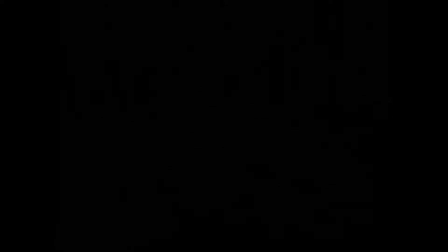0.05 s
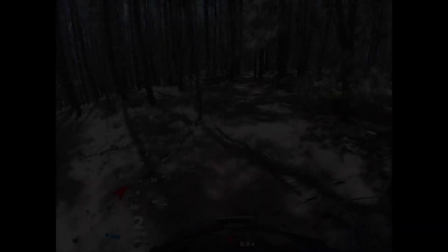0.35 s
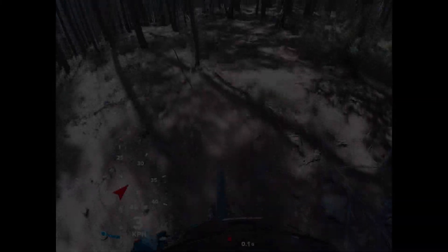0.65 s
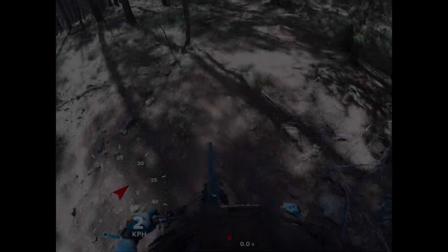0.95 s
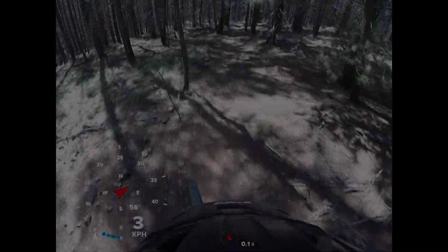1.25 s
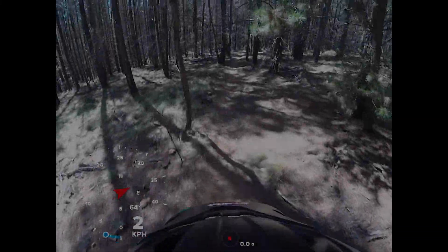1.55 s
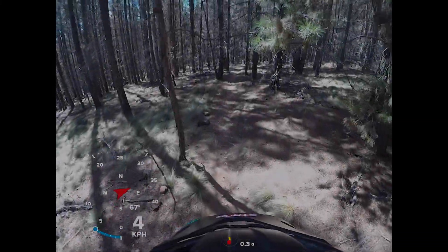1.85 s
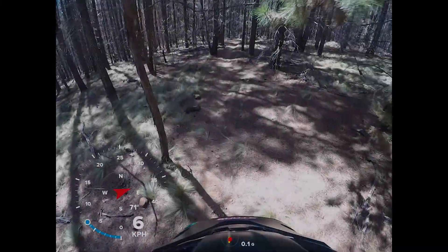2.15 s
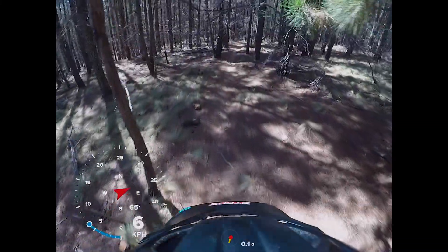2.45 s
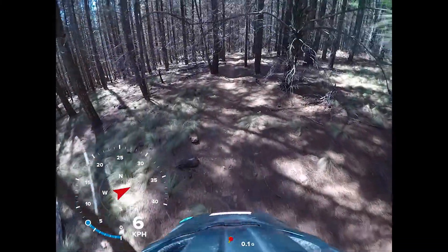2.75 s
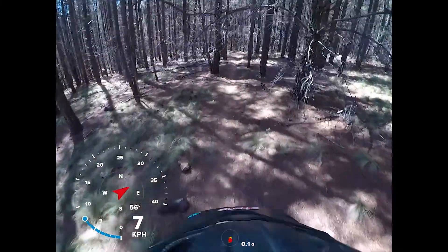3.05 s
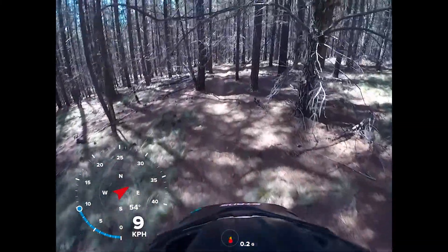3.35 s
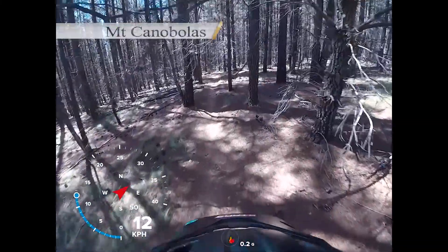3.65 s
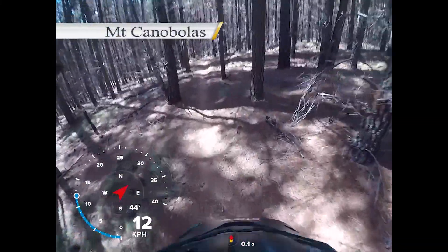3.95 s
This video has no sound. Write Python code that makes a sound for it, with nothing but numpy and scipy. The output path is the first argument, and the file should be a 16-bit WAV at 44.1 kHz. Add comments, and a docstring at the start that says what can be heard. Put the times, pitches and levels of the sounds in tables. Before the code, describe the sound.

A mountain bike sets off on a dry forest trail, its tyre rumble fading in under wind on the helmet microphone. Two sharp pedal clacks ring out, then the tyres crunch faster, thudding over bumps and knocking stones.

```python
"""Wind buffeting the microphone and a low tyre rumble fade in: a mountain bike sets off along a dry
forest trail, heard from the rider's helmet. Two sharp clacks ring out, likely shoes snapping into
the pedals, while a thin hiss sinks in pitch. Then the tyres crunch faster over dirt and needles,
flick stones and twigs and thud over bumps, with short runs of ticking, likely the freehub."""
import sys
import numpy as np
from scipy import signal
from scipy.io import wavfile

SR = 44100
rng = np.random.default_rng(int(sys.argv[2]) if len(sys.argv) > 2 else 0)


def inscribe(sig):
    """Save sig as 16-bit PCM at rate SR to the path in sys.argv[1].

    A 1-D sig is mono; a 2-D sig holds one channel per row.
    Samples are clipped to [-1, 1] before scaling.
    """
    pcm = np.round(np.clip(np.atleast_2d(sig).T, -1, 1) * 32767)
    wavfile.write(sys.argv[1], SR, pcm.astype(np.int16))


N = 176400
T = np.arange(N) / SR

# Spectra give tone colour only: their levels are relative, per hertz.
# microphone hiss: f/Hz, level/dB
MIC_HISS_SPECTRUM = [(1000, 12), (4000, -8.5), (8000, 5.5), (10300, 1.5), (12000, -5.5), (14000, -35)]
# thin hiss sinking as the bike moves off: t/s, f/Hz, level/dB
HISS_GLIDE = [(.2, 9400, -93), (.45, 9210, -73.5), (.63, 9700, -72), (.66, 7580, -72.5), (.85, 7130, -75),
              (1.05, 6933, -78), (1.3, 5835, -76), (1.9, 5305, -79.5)]
# wind on the microphone: t/s, level/dB
WIND_LEVEL = [(0, -36.5), (.47, -38.5), (.54, -34), (.67, -39), (.85, -35.5), (1.5, -37), (1.72, -38.5),
              (1.95, -34), (2.03, -31.5), (2.12, -32.5), (2.45, -35.5), (2.53, -35), (2.7, -34),
              (2.79, -24.5), (2.96, -29), (3.06, -26), (3.13, -35.5), (3.4, -34.5), (3.5, -31.5),
              (4, -31.5)]
# its bass-heavy colour: f/Hz, level/dB
WIND_SPECTRUM = [(18, -1.5), (30, 5.5), (50, -3), (80, -3), (130, -10.5), (200, -14), (300, -29.5),
                 (600, -49.5)]
# how hard the bike rolls: t/s, share/0-1
ROLLING_PACE = [(0, 0.75), (1.8, 0.32), (2.3, 0.51), (2.9, 0.84), (4, 1)]
# rumble of tyres and frame: t/s, level/dB
RUMBLE_LEVEL = [(0, -51), (.5, -51.5), (.85, -46.5), (1.35, -55), (1.5, -43.5), (1.72, -50), (1.83, -44.5),
                (1.96, -57.5), (2.02, -42), (2.22, -45.5), (2.46, -47), (2.54, -42.5), (2.63, -44.5),
                (2.77, -34.5), (2.92, -41.5), (3.12, -43), (3.42, -47), (3.52, -37), (3.78, -47.5),
                (4, -41.5)]
# its colour at full pace: f/Hz, level/dB
RUMBLE_SPECTRUM = [(80, -38.5), (140, 3.5), (250, -0.5), (430, -1), (600, -5.5), (800, -16), (1200, -28.5),
                   (2500, -60.5)]
# runs of ticking: t/s, length/s, rate/Hz, level/dB
TICK_RUNS = [(2.029, .07, 59, -52), (2.198, .05, 78, -52.5), (2.411, .08, 57, -51)]
# dry needles crackling: t/s, level/dB
NEEDLE_LEVEL = [(0, -102), (1.5, -67), (2.05, -69.5), (2.3, -64.5), (2.45, -76.5), (2.63, -62), (2.7, -69),
                (2.8, -78), (3.1, -73), (4, -77)]
# crunch under the tyres: t/s, level/dB
CRUNCH_LEVEL = [(0, -67.5), (.55, -60.5), (.9, -57), (1.05, -54), (1.18, -63), (1.28, -57.5), (1.45, -58.5),
                (1.75, -61), (1.93, -63.5), (2.2, -61), (2.46, -53.5), (2.62, -60.5), (2.7, -63),
                (2.76, -54.5), (3.12, -59), (3.3, -54.5), (3.68, -59.5), (4, -54.5)]
# colour of its grit and swish: f/Hz, level/dB
CRUNCH_SPECTRUM = [(400, -1), (750, 1.5), (1100, 1), (1600, -1.5), (2200, -7), (3000, -11), (4300, -19),
                   (6500, -27), (10000, -45.5)]
# a tread knob crushes a patch of litter: t/s, level/dB, half-width/s
LITTER_CRUSHES = [(1.749, -55.5, 0.0104), (2.484, -54, 0.0049), (2.57, -56, 0.0355), (2.637, -52.5, 0.0242),
                  (2.752, -49.5, 0.0102), (2.846, -58.5, 0.0047), (2.939, -56, 0.0119),
                  (3.031, -50.5, 0.0081), (3.812, -56, 0.0224), (3.887, -52.5, 0.0046),
                  (3.945, -48.5, 0.0047)]
# dull knocks of wheel and frame: t/s, level/dB, f/Hz
BUMP_HITS = [(1.191, -32, 219.7), (1.504, -29.5, 135.6), (1.57, -30.5, 267.5), (1.626, -38.5, 406.4),
             (2.004, -27, 120.1), (2.037, -30, 111.6), (2.038, -33, 227), (2.136, -31, 150),
             (2.222, -32.5, 174.5), (2.507, -30.5, 108.3), (2.715, -28.5, 256.1), (2.758, -16.5, 145.8),
             (2.77, -26, 191), (2.804, -22, 114.6), (2.894, -23.5, 116.4), (2.915, -29, 360),
             (2.972, -22, 80.3), (3.04, -22, 77.5), (3.343, -30, 357.6), (3.679, -26.5, 407.7)]
# stones and twigs hit by the tyres: t/s, level/dB, f/Hz, relative snap/dB
STONE_HITS = [(.7214, -32.5, 4040, -9.5), (0.8343, -38.5, 1970, -3.5), (1.29, -36.5, 710, -9),
              (1.6364, -35.5, 1429, -11.5), (1.6677, -36, 2220, -26.5), (1.7341, -35.5, 1590, -26.5),
              (1.752, -37.5, 1020, -27), (1.864, -42.5, 1062, -18), (2.1868, -37.5, 1390, -18),
              (2.5374, -16, 923.5, -25.5), (2.877, -23.5, 1150, -13), (3.2865, -32, 850, -18.5),
              (3.589, -38.5, 682, -26.5), (3.953, -29, 627, -29)]
# woody tock of each hit: pitch ratio, level/dB, t60/cycles
TOCK_MODES = [(.72, -4, 0.5), (1, -3, 18), (1.38, -1.5, 6), (1.85, -9.5, 17.5), (2.4, -19, 34.5)]
# the wheel ringing on: f/Hz, level/dB, t60/s
WHEEL_MODES = [(640.1, -22, 0.227), (771.2, -20.5, 0.107), (1150, -27.5, 0.085)]
# pedal clacks: t/s, body/dB, metal/dB, scrape/dB, body pitch ratio, bounce delay ratio
PEDAL_CLACKS = [(1.0822, -24.5, -44.5, -56, 1.014, 0.997), (1.531, -27.5, -30.5, -49, 1.176, 1.3254)]
# contacts within a clack: delay/s, level/dB
CLEAT_BOUNCES = [(0, -5), (.0024, 2.18)]
# body of the pedal: f/Hz, level/dB, t60/s
PEDAL_MODES = [(291.4, -3.5, 0.054), (353.3, -3, 0.0271), (699.4, 3.5, 0.0251), (840, -11, 0.0312),
               (1020, -10, 0.027), (1176, -20.5, 0.031), (2154, -24, 0.0263), (2513, -23.5, 0.0487),
               (3680, -22.5, 0.035)]
# noise burst of metal on metal: f/Hz, level/dB
METAL_SPECTRUM = [(350, 14.5), (800, 4), (1300, 2), (1900, -3.5), (3000, -4.5), (4300, -1.5), (5900, 1),
                  (7000, -9), (9000, -18.5), (12000, -26.5), (14000, -40)]
# ring of the pedal spring: f/Hz, level/dB, t60/s
SPRING_MODES = [(4174, -7.5, 0.082), (5120, -15.5, 0.073), (5511, -7, 0.065), (5950, -2, 0.084),
                (6160, -13, 0.137)]
# master fader: t/s, level/dB
FADE_IN = [(.128, -64), (.142, -23.5), (.25, -11.5), (.4, -6.5), (.55, -3)]


def from_db(db):
    """Decibels to gain."""
    return 10 ** (np.asarray(db) / 20)


def rms_one(x):
    """Scale to unit power."""
    return x / np.sqrt(np.mean(x ** 2) + 1e-20)


def curve(rows, column=1):
    """One column of an automation curve at every sample."""
    rows = np.array(rows)
    return np.interp(T, rows[:, 0], rows[:, column])


def band(x, low_hz, high_hz):
    """Gentle band-pass."""
    sos = signal.butter(2, [low_hz, min(high_hz, SR / 2 - 1)], "band", fs=SR, output="sos")
    return signal.sosfilt(sos, x + 1e-18)


def lowpass(x, hz):
    """Steep treble cut."""
    return signal.sosfilt(signal.butter(6, hz, fs=SR, output="sos"), x)


def drift(rate_hz):
    """Smooth random wobble with spread 1."""
    hop, settle = 40, 2000
    pole = np.exp(-2 * np.pi * hop * rate_hz / SR)
    noise = rng.standard_normal(N // hop + settle + 2)
    slow = signal.lfilter([1], [1, -2 * pole, pole * pole], noise)[settle:]
    return np.interp(np.arange(N) / hop, np.arange(len(slow)), rms_one(slow))


def white():
    """White noise."""
    return rng.standard_normal(N)


def noise_band(low_hz, high_hz):
    """A band of noise at unit power."""
    return rms_one(band(white(), low_hz, high_hz))


def coloured(spectrum, flicker_db, source=white):
    """Third-octave bands of a source, each with its own level and flicker; unit power."""
    hz, db = np.transpose(spectrum)
    edges = 16 * 2 ** (np.arange(31) / 3)
    out = np.zeros(N)
    for low, high in zip(edges, edges[1:]):
        if high > hz[0] and low < hz[-1]:
            band_db = np.interp(np.log(np.sqrt(low * high)), np.log(hz), db)
            out += from_db(band_db + flicker_db * drift(18.25)) * band(source(), low, high)
    return rms_one(out)


def decay(start, t60):
    """Envelope with an instant attack, falling 60 dB in t60 seconds."""
    return (T >= start) * np.exp(-np.log(1000) * np.clip((T - start) / t60, 0, 2))


def ring(start, hz, t60):
    """One struck mode."""
    return decay(start, t60) * np.sin(2 * np.pi * hz * (T - start))


def swell(centre, half_width):
    """Bell-shaped envelope."""
    return np.exp(-np.minimum(((T - centre) / half_width) ** 2, 20))


def mic_hiss():
    """A faint bed of microphone hiss."""
    return from_db(-71.5) * coloured(MIC_HISS_SPECTRUM, flicker_db=3)


def thin_hiss(half_width_hz=926):
    """A soft hiss: its bright band glides down over a body that holds its pitch."""
    carrier = np.cos(2 * np.pi * np.cumsum(curve(HISS_GLIDE)) / SR)
    glide = rms_one(lowpass(white(), half_width_hz) * carrier)
    body = from_db(1) * noise_band(4010, 6360)
    return from_db(curve(HISS_GLIDE, column=2)) * (glide + body)


def wind():
    """Air buffets the microphone in lumpy low gusts."""
    gusts = from_db(curve(WIND_LEVEL) + 1.27 * drift(12.06))
    return gusts * coloured(WIND_SPECTRUM, flicker_db=2.5)


def rumble(slow_top_hz=340):
    """Rough ground shakes tyres and frame, duller when the bike is slow."""
    full = coloured(RUMBLE_SPECTRUM, flicker_db=1)
    dull = rms_one(lowpass(coloured(RUMBLE_SPECTRUM, flicker_db=2), slow_top_hz))
    pace = curve(ROLLING_PACE)
    crossfade = pace * full + np.sqrt(1 - pace ** 2) * dull
    return from_db(curve(RUMBLE_LEVEL) + 2.235 * drift(28)) * crossfade


def freehub(pawl_hz=(2200, 3666), jitter=0.25):
    """Pawls drop over the ratchet in short, slightly uneven runs."""
    ticks = np.zeros(N)
    for start, length, rate, db in TICK_RUNS:
        for k in range(int(length * rate) + 1):
            onset = start + (k + jitter * rng.uniform(-1.1, 1)) / rate
            ticks += from_db(db) * decay(onset, t60=0.0232)
    return band(ticks * noise_band(*pawl_hz), *pawl_hz)


def needles(snaps_per_s=520, spread_db=3.5, pitch_hz=(2178, 4295), t60_cycles=12):
    """Dry needles break under the tread: tiny snaps at scattered pitches."""
    snaps = (rng.random(N) < snaps_per_s / SR) * rng.choice([-1, 1], N)
    snaps = snaps * from_db(spread_db * np.minimum(rng.exponential(1, N), 3.5))
    pitch_index = rng.integers(0, 10, N)
    out = np.zeros(N)
    for k, hz in enumerate(np.geomspace(*pitch_hz, 10)):
        pole = np.exp(-np.log(1000) * hz / (t60_cycles * SR))
        resonator = [1, -2 * pole * np.cos(2 * np.pi * hz / SR), pole * pole]
        out += signal.lfilter([1, 0, -1], resonator, snaps * (pitch_index == k) + 1e-18)
    return from_db(curve(NEEDLE_LEVEL)) * rms_one(band(out, 1100, 4530))


def crunch(full_pace_grains_per_s=1100, spread_db=1):
    """Grit cracks under the tread over a soft swish, denser with pace, surging on patches of litter."""
    pace = curve(ROLLING_PACE)
    grains = rng.random(N) < full_pace_grains_per_s * pace / SR
    grains = grains * from_db(spread_db * np.minimum(rng.exponential(1, N), 3.4))
    grit = coloured(CRUNCH_SPECTRUM, flicker_db=3.5, source=lambda: grains * white()) * np.sqrt(pace)
    swish = coloured(CRUNCH_SPECTRUM, flicker_db=3)
    rolling = from_db(curve(CRUNCH_LEVEL) + 2.63 * pace * drift(30))
    crushes = sum(from_db(db) * swell(centre, width) for centre, db, width in LITTER_CRUSHES)
    return (rolling + crushes) * (from_db(0.5) * grit + from_db(-0.5) * swish)


def bumps(attack_cycles=0.528, t60_cycles=12.4):
    """Wheel and frame take each bump with a soft, heavily damped thud."""
    out = np.zeros(N)
    for start, db, hz in BUMP_HITS:
        attack = 1 - np.exp(-np.clip((T - start) * hz / attack_cycles, 0, 20))
        out += 2 * from_db(db) * attack * ring(start, hz, t60_cycles / hz)
    return out


def stones():
    """Each stone or twig gives a woody tock with a snap on top, and leaves the wheel ringing."""
    out = np.zeros(N)
    snap_noise = noise_band(1995, 5220)
    for start, hit_db, pitch_hz, snap_db in STONE_HITS:
        tock = np.zeros(N)
        for k, (ratio, db, cycles) in enumerate(TOCK_MODES):
            mode_hz = pitch_hz * ratio
            tock += (-1) ** k * from_db(db) * ring(start, mode_hz, cycles / mode_hz)
        wheel = sum(from_db(db) * ring(start, hz, t60) for hz, db, t60 in WHEEL_MODES)
        snap = 0.5 * from_db(snap_db) * snap_noise * decay(start, t60=0.022)
        out += from_db(hit_db) * (tock + wheel + snap)
    return lowpass(out, hz=6940)


def pedal_clacks(scrape_s=0.0125):
    """The cleat scrapes in and snaps home, ringing pedal and spring; the trees return a faint tail."""
    out = np.zeros(N)
    metal = coloured(METAL_SPECTRUM, flicker_db=0.5)
    scrape = noise_band(4740, 6200)
    forest = noise_band(4570, 7200)
    rattle = noise_band(6500, 9620)
    for start, body_db, metal_db, scrape_db, pitch, stretch in PEDAL_CLACKS:
        out += from_db(scrape_db) * scrape * swell(start - scrape_s / 2, scrape_s)
        for delay, bounce_db in CLEAT_BOUNCES:
            contact = start + delay * stretch
            body = sum(from_db(db) * ring(contact, hz * pitch, t60) for hz, db, t60 in PEDAL_MODES)
            out += from_db(body_db + bounce_db) * body
            out += from_db(metal_db + bounce_db) * metal * decay(contact, t60=0.0135)
        spring = sum(from_db(db) * ring(start + rng.random() / hz, hz, t60)
                     for hz, db, t60 in SPRING_MODES)
        tail = from_db(-4.5) * (spring + metal * decay(start, t60=0.142))
        tail += from_db(-22.5) * rattle * decay(start, t60=0.204)
        tail += from_db(-30) * forest * decay(start, t60=0.95)
        out += from_db(metal_db) * tail
    return out


def scene():
    """The mono mix at the rider's helmet."""
    bed = mic_hiss() + wind() + rumble()
    texture = crunch() + needles() + freehub()
    hits = stones() + bumps() + pedal_clacks()
    return (bed + texture + hits + thin_hiss())[None]


def record(dry):
    """Fade the mix in and cut the very top of the treble."""
    cutoff_hz = 15200
    steep = signal.ellip(10, .1, 80, cutoff_hz, fs=SR, output="sos")
    return signal.sosfilt(steep, dry * from_db(curve(FADE_IN)))


dry = scene()
out = record(dry)
inscribe(out)
```